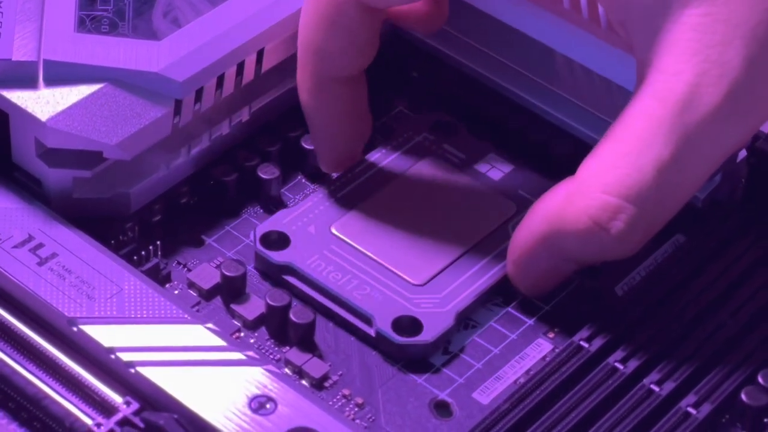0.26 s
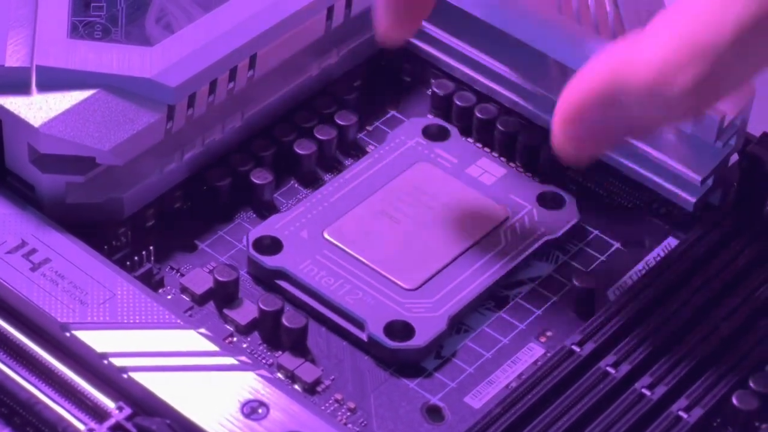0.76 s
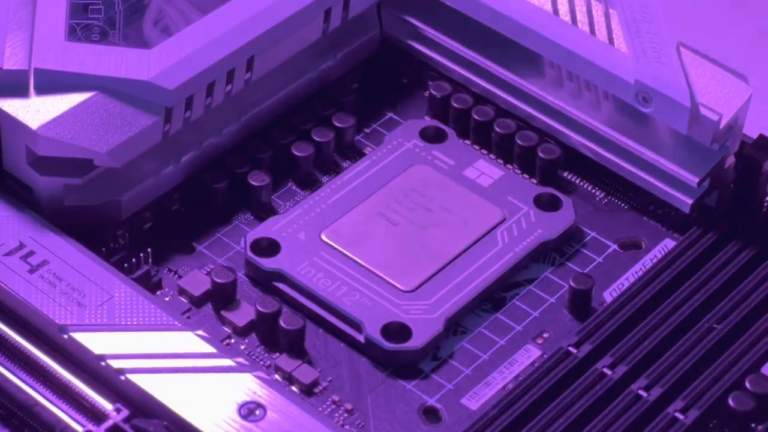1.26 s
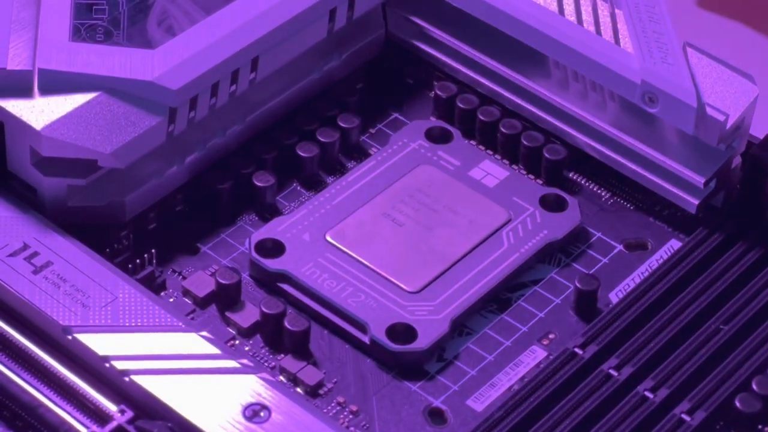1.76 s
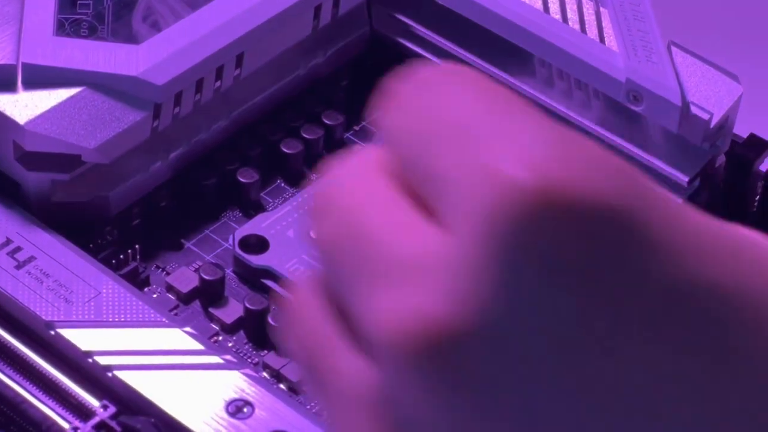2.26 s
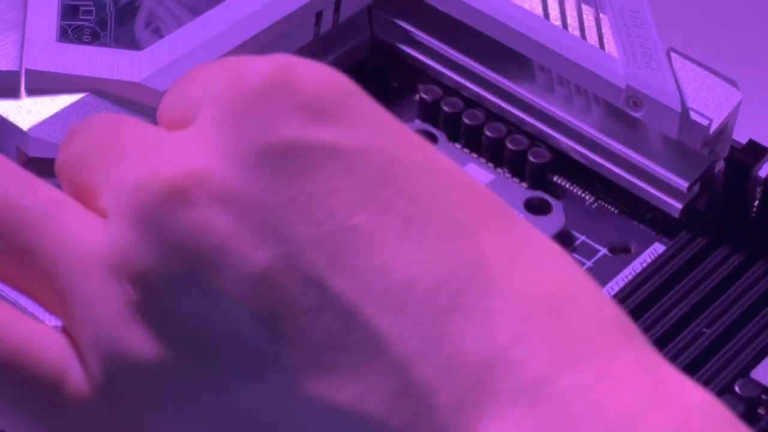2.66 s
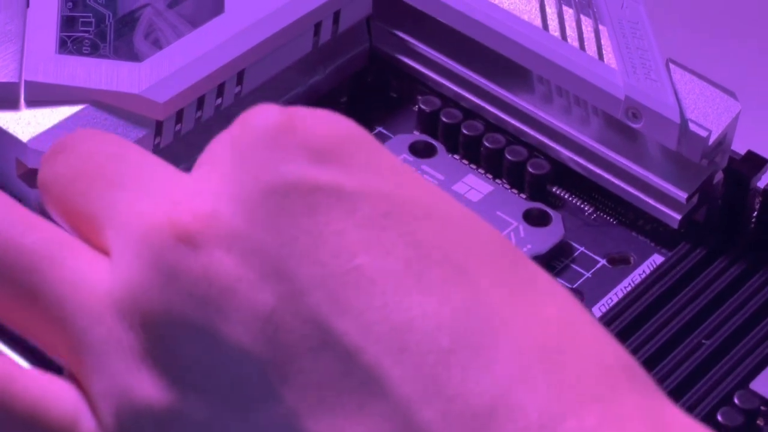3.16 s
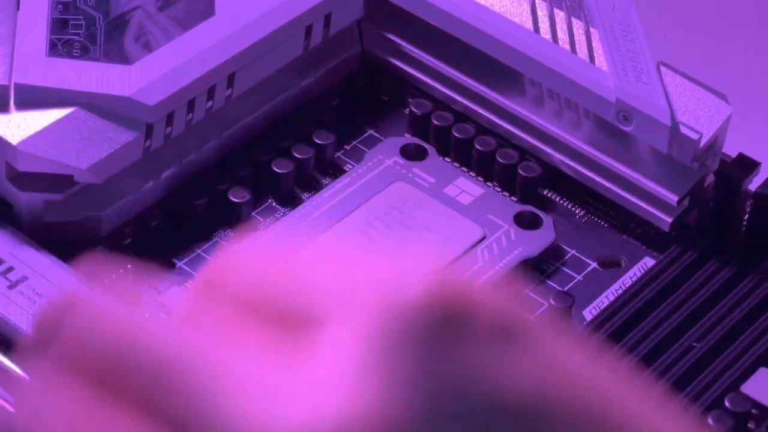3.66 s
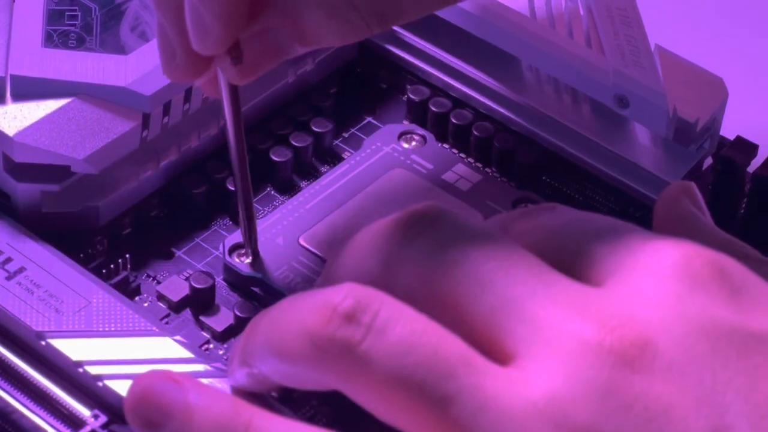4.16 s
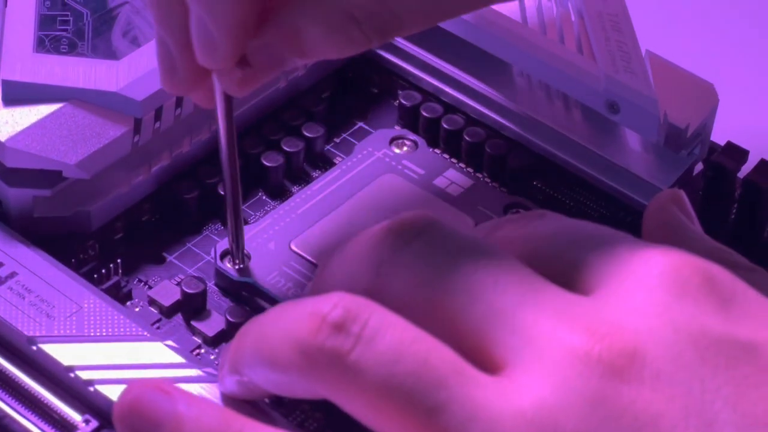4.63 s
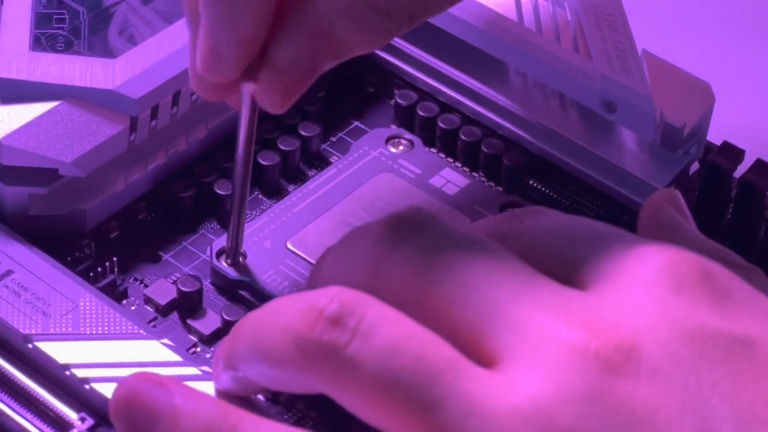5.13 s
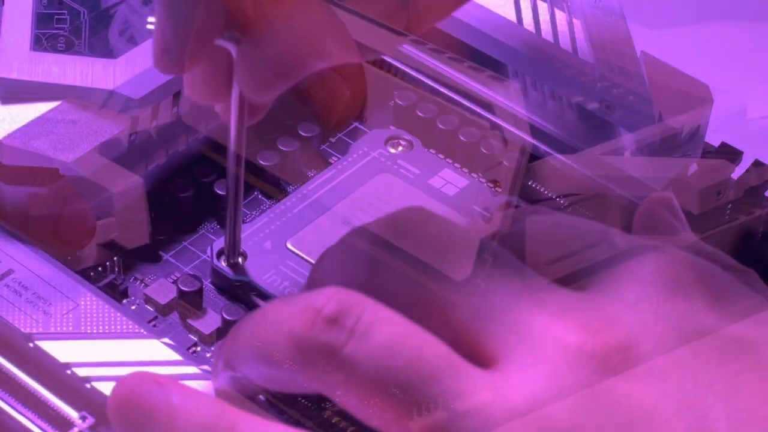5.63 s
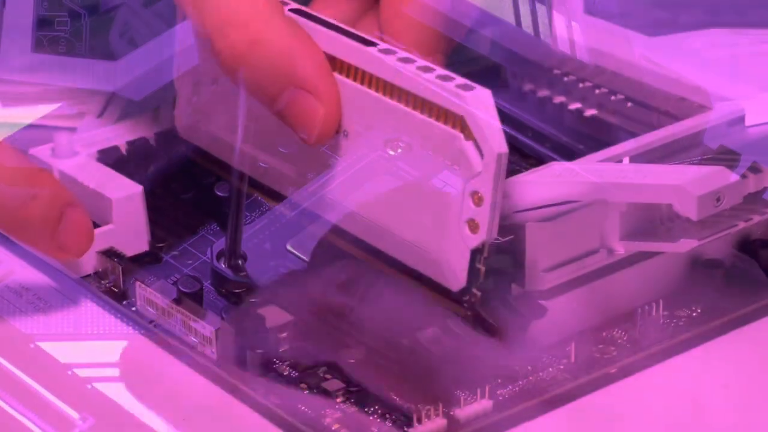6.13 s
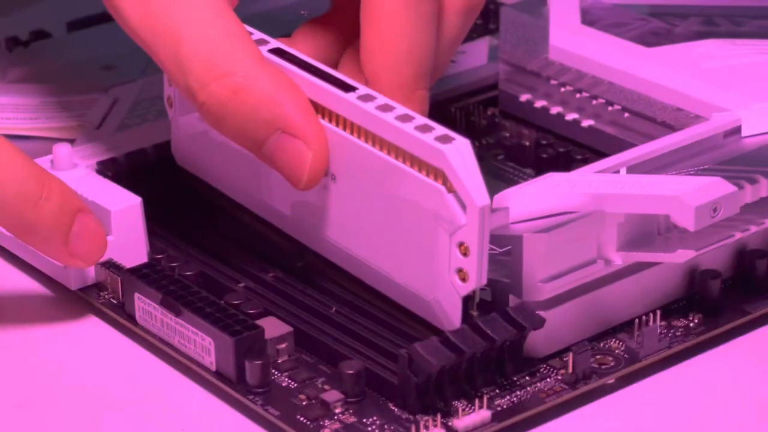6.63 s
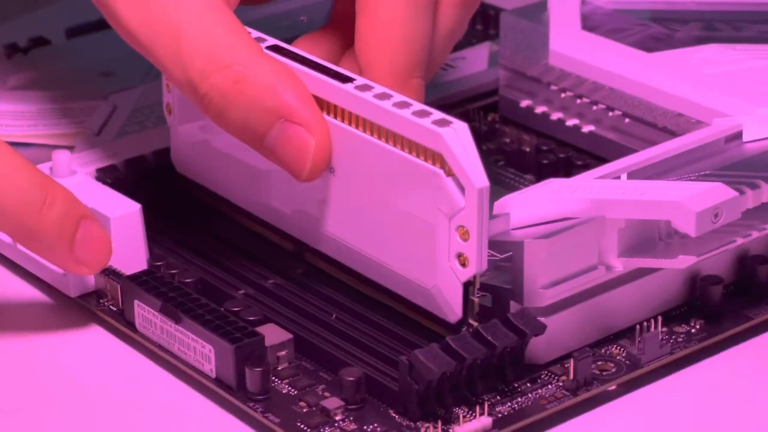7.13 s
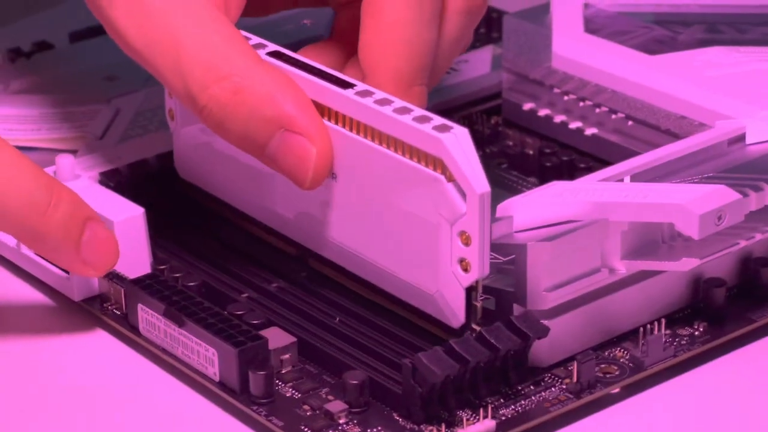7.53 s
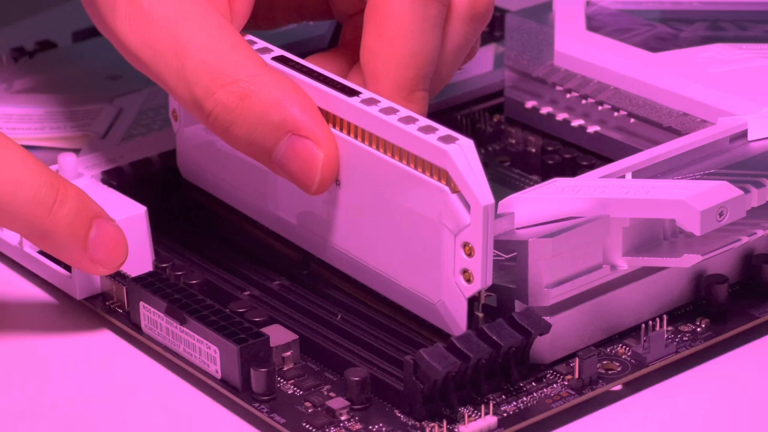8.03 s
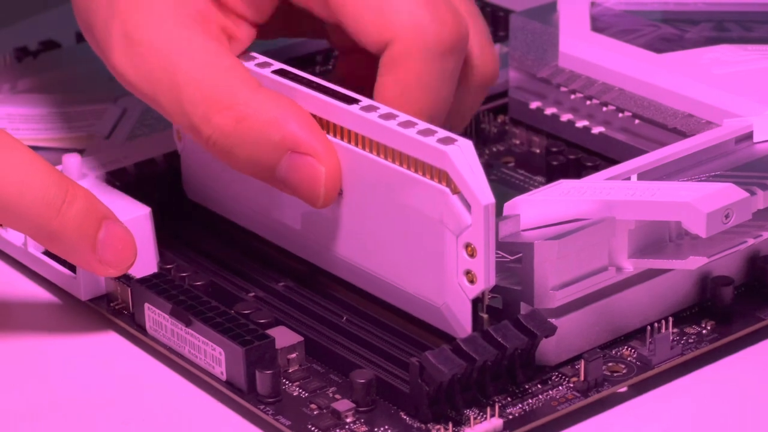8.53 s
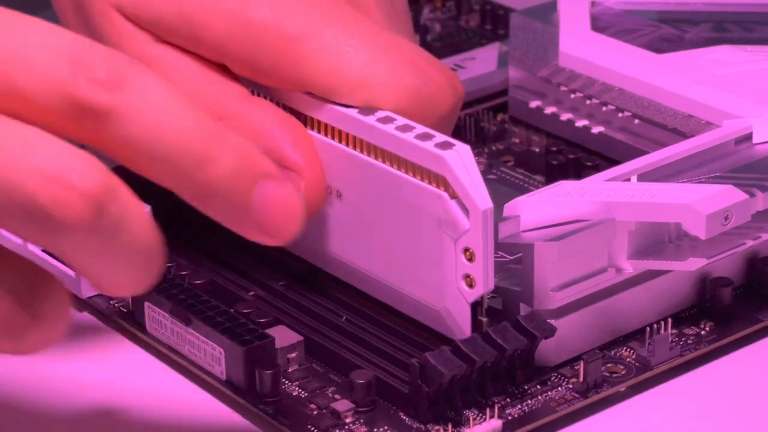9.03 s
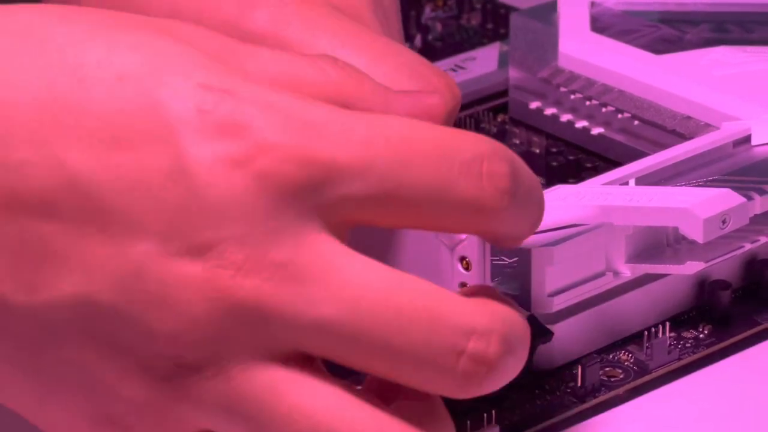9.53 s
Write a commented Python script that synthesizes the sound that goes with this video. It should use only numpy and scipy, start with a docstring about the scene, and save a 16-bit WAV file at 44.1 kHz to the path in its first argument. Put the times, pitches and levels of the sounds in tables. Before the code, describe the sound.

A small metal frame lands on a circuit board right at the start with a sharp, short clank and a soft desk thump. Near 1.8 seconds a part scuffs briefly over the desk. At about 2.9 seconds a screw drops, rattles brightly on the frame and bounces to rest. From 4.2 to 5.7 seconds a screwdriver makes light, irregular steel ticks in the screw head. From 6.5 seconds a memory module is worked into its slot with plastic clicks and dull knocks, while pushing hands make the desk rumble. A loud latch snap comes at 8.2 seconds, followed by smaller snaps until 8.8, faint finger rubbing and a hollow knock around 9.5. The work is close to a stereo microphone in a quiet room with a short, dull echo. Soft room air and mains hum lie underneath, joined from about 4 seconds by a faint, wavering low drone.

```python
"""A metal frame clanks down on a desk, close to a stereo microphone in a quiet room: a computer is being
built by hand. A part scuffs over the desk, a screw drops and rattles on the frame, a screwdriver ticks
in a screw head, then a memory module is seated and its latches snap. Each contact is a crack of noise;
most also ring the modes of the part, and some leave a short noisy wash. Fingers rub, and pushing hands
make the desk rumble. Behind lie room air, mains hum, a few faint tones and a low wavering drone."""
import sys
import numpy as np
from scipy import signal
from scipy.fft import rfft, irfft, next_fast_len
from scipy.io import wavfile

SR = 44100
rng = np.random.default_rng(int(sys.argv[2]) if len(sys.argv) > 2 else 0)


def dump(signal):
    """Clip the signal to [-1, 1] and save it as 16-bit WAV at the path in sys.argv[1]."""
    limited = np.clip(np.atleast_2d(signal).T, -1, 1)
    pcm = np.round(limited * 32767).astype(np.int16)
    wavfile.write(sys.argv[1], SR, pcm)


N = 431738

# Levels are relative: each source adds its own gains and filters.
# spectrum of the room air (frequency [Hz], level [dB])
AIR_SPECTRUM = [(18, -39.5), (35, -0.5), (59, 2), (92, -5.5), (170, -5.5), (366, -13), (700, -22),
                (1760, -37), (2900, -43), (4300, -57.5), (7500, -55), (10000, -59), (13500, -51.5),
                (15200, -59)]
# likeness of the air at left and right (frequency [Hz], correlation [0-1])
AIR_CORRELATION = [(30, 0.41), (120, 1), (250, 0.91), (500, 0.59), (1500, 0.9), (4000, 1), (12000, 0.9)]
# borders of the five air bands (frequency [Hz])
AIR_CROSSOVERS = [75, 300, 1200, 4000]
# lowest air band (time [s], level [dB])
AIR_DEEP_BASS = [(0, -67), (1.0, -66), (1.6, -57), (2.05, -64), (2.5, -57.5), (2.9, -61.5), (3.8, -68),
                 (5.0, -62.5), (5.9, -63.5), (6.25, -69.5), (7.3, -55.5), (8.0, -56.5), (8.3, -50),
                 (8.6, -57.5), (9.05, -53.5), (9.4, -60), (9.79, -61)]
# four upper air bands (level [dB], swell followed [dB per dB])
AIR_UPPER_BANDS = [(-62.5, 0.54), (-66.5, .9), (-77, 1.1), (-87.5, .3)]
# distant wash, strongest in the middle bands (time [s], level [dB])
AIR_SWELL = [(0, 3.5), (1.0, 0.5), (3.85, -0.5), (3.92, 4.5), (4.6, 5), (5.55, 8.5), (5.95, 2.5),
             (7.5, 3.5), (9.79, 1)]
# mains hum (time [s], level [dB])
HUM_LEVEL = [(0, -58.5), (3.8, -63), (4.0, -64), (5.6, -66.5), (6.2, -76), (9.79, -71)]
# faint background tones (start [s], end [s], frequency [Hz], level [dB])
FAINT_TONES = [(.55, 0.75, 687, -65.5), (4.0, 5.3, 344.6, -66.5), (4.3, 5.8, 499, -70),
               (5.301, 5.7, 1104, -72.5), (6.4, 9.79, 302, -63), (0, 3.7, 361, -74), (0, 4.8, 244, -71)]
# modes of the metal frame (frequency [Hz])
FRAME_PITCHES = [752, 845, 946, 1100, 1192, 1500, 1643, 1810, 1900, 1970, 2872, 2905, 5097, 5917, 6519,
                 7450, 8500, 10350, 11190, 12070, 12800, 12873, 14050, 15490]
# the same modes (level when set down [dB], level under the screw [dB], free t60 [s])
FRAME_RESPONSE = [(-11, -44, 0.09), (-14.5, -34, 0.08), (-15, -34.5, 0.08), (-12.5, -17, 0.056),
                  (-7.5, -16, 0.049), (-14.5, -14.5, .06), (-14.5, -28, 0.076), (-15.5, -6.5, 0.058),
                  (-11, -14, 0.1), (-20, -13, .06), (-2, -10, 0.05), (-19.5, -24, .12), (-11.5, -28, .06),
                  (-13, 1, .11), (-20.5, -10.5, 0.051), (-12, -12.5, 0.077), (-18, -14, 0.04),
                  (-20.5, -10, 0.084), (-30, -15, 0.18), (-25.5, -10, .08), (-24.5, -6.5, 0.14),
                  (-19.5, -9, 0.11), (-33, -40, .06), (-45.5, -20, .1)]
# frame landing (time [s], level [dB], desk thump [dB])
FRAME_HITS = [(0.0927, -28.5, -36), (0.1036, -11.5, -31), (0.1064, -13, -36)]
# modes of the thumped desk (frequency [Hz], level [dB], t60 [s])
DESK_MODES = [(61.02, -12, 0.23), (107.5, -1.5, 0.21), (155.25, -1, 0.2), (207.4, -6, .4), (299, -19, .3),
              (393.5, -14.5, 0.13)]
# hands pushing down (peak time [s], level [dB], t60 [s])
HAND_PUSHES = [(6.2, -60, 1.8), (6.54, -43, 0.62), (6.849, -43, 0.12), (7.27, -48, 0.31), (7.62, -51, 0.55),
               (8.17, -37, 0.93), (8.34, -46.5, 0.39), (8.71, -55, .3), (8.821, -45, 0.61),
               (9.54, -39.5, 0.27)]
# rubbing, and the short noisy wash after the frame, screw and latch hits
# (peak time [s], rise [s], hold [s], level [dB], treble [dB])
RUBS_AND_WASHES = [(.12, .01, 0.048, -60.5, -12.5), (1.148, 0.12, 0.019, -80.5, -2),
                   (1.399, .25, 0.22, -94, 5.5), (1.785, .05, 0.089, -58, -12.5),
                   (2.17, 0.028, .02, -82, 0), (2.3, 0.14, .55, -77.5, -16), (3.135, .005, 0.023, -66, 4),
                   (5.201, .6, .5, -72, -22), (6.499, 0.024, 0.021, -67, 1), (6.845, .01, 0.048, -68, -23),
                   (6.99, 0.0058, 0.063, -64.5, -16), (7.549, 0.066, 0.068, -64, -20),
                   (8.123, 0.027, 0.019, -52.5, -2.5), (8.197, .005, 0.16, -65, -15),
                   (8.435, .005, .08, -63.5, -16), (8.814, .005, 0.029, -65, -11.5),
                   (8.899, .05, 0.21, -92, 4), (9.114, .12, 0.09, -76, -4),
                   (9.516, 0.024, 0.02, -61.5, -31), (9.562, 0.0087, 0.012, -85.5, 12)]
# broad modes of rubbed plastic (frequency [Hz], level [dB], t60 [s])
PLASTIC_MODES = [(980, -6.5, 0.017), (1770, 2, 0.013), (2849, 1.5, 0.0031), (3650, -6, 0.011)]
# a dragged part catching on the desk (time [s], level [dB], treble [dB])
DRAG_CATCHES = [(1.741, -55, -13), (1.7793, -47, -4), (1.7844, -50, -8), (1.793, -49, 0.5),
                (1.8068, -49.5, 5.5), (1.861, -46, -0.5), (1.8854, -53, 1.5)]
# screw striking the frame (time [s], level [dB])
SCREW_HITS = [(2.9047, -41), (2.939, -54), (2.948, -53.5), (3.036, -41), (3.0421, -36.5), (3.052, -32),
              (3.066, -38.5), (3.078, -42), (3.09, -47.5), (3.105, -48), (3.117, -44)]
# screw bouncing to rest on the board (time [s], level [dB])
SCREW_BOUNCES = [(3.1347, -26), (3.1423, -27.5), (3.1547, -35)]
# modes of the board (frequency [Hz], level [dB], t60 [s])
BOARD_MODES = [(1290, -35, 0.0295), (2010, -18, 0.026), (2460, -29, 0.011), (2980, 3.5, 0.012),
               (3517, 8.5, 0.0092), (5100, -0.5, 0.011), (5630, -2, 0.011), (7100, -7, 0.014),
               (8750, -1, 0.014), (12900, -16, .012)]
# pitch of the low drone (time [s], frequency [Hz])
DRONE_PITCH = [(3.9, 198.1), (5.8, 199.9), (6.4, 205.8), (8.5, 207.7), (8.62, 203.6), (8.78, 209.4),
               (9.79, 206.7)]
# strength of the low drone (time [s], level [dB])
DRONE_LEVEL = [(3.9, -57), (4.3, -63.5), (4.9, -63), (5.45, -56.5), (5.95, -70.5), (6.5, -60), (7.05, -66),
               (7.4, -51.5), (7.52, -62), (7.66, -53), (7.85, -59.5), (8.03, -53.5), (8.55, -63),
               (8.66, -44.5), (8.77, -43), (8.89, -64.5), (9.45, -55), (9.56, -53), (9.79, -56.5)]
# bit ticking in the screw head (time [s], level [dB], treble [dB])
BIT_TICKS = [(4.2081, -49, -22), (4.214, -38.5, -2.5), (4.4067, -44, -9.5), (4.4785, -46, -34),
             (4.7987, -44, -10.5), (4.8207, -33.5, -8), (4.9441, -53, -35), (5.0344, -49.5, -36),
             (5.11, -41.5, -17.5), (5.272, -55.5, -14), (5.7063, -50.5, -20), (6.108, -63, -27),
             (6.134, -60, -27)]
# modes of screw and bit (frequency [Hz], level [dB], t60 [s])
BIT_MODES = [(1250, -20, 0.032), (1540, -13.5, 0.031), (1760, -9.5, 0.023), (1820, 2, 0.03),
             (2150, 2.5, 0.021), (2504, 2.5, 0.01), (2810, 0.5, 0.013), (3250, -9, 0.035),
             (5115, -1, 0.019), (5740, -2, 0.018), (7020, -7, .014), (8340, -23, 0.031), (12500, -20, .012)]
# module and latches clicking (time [s], level [dB], treble [dB], desk thump [dB])
MODULE_CLICKS = [(6.4996, -49.5, -19, -49.5), (6.5209, -34.5, -11, -37.5), (6.6059, -50, -31, -42.5),
                 (6.7336, -62, -27, -53.5), (6.8369, -42, -34, -50), (6.993, -36, -47, -54),
                 (7.5563, -35, -42, -44.5), (7.6385, -43.5, -33, -43), (7.711, -55.5, -22, -51),
                 (8.125, -44, -8, -60), (8.143, -41, -5, -63), (8.163, -47, -10, -62),
                 (8.197, -24, -3, -36), (8.3124, -29.5, -9, -54), (8.4368, -36, -8.5, -52),
                 (8.493, -44, -37, -48.5), (8.5302, -56.5, 3, -60), (8.8065, -32.5, -17, -38),
                 (9.1193, -49.5, 1.5, -54), (9.4808, -52, -26, -43), (9.518, -43.5, -16, -50),
                 (9.579, -70.5, -12, -56)]
# modes of module and latches (frequency [Hz], level [dB], t60 [s])
MODULE_MODES = [(674, -0.5, 0.031), (960, -9, .03), (1330, -1.5, 0.026), (1650, -8.5, 0.044),
                (1834, -0.5, 0.032), (2134, -5.5, 0.022), (2443, 6.5, 0.013), (2816, 6, 0.019),
                (2960, -10, 0.015), (3420, -14, 0.015), (3754, -18, .012), (4430, 0.5, 0.0087),
                (5130, -7, .012), (6130, -3, 0.035), (7460, -10.5, .012), (12500, -20, .012)]
# knocks on the slot (time [s], level [dB])
SLOT_KNOCKS = [(8.123, -36.5), (8.135, -50), (8.152, -40), (8.161, -40), (9.489, -34.5), (9.501, -49)]
# hollow modes of the slot (frequency [Hz], level [dB], t60 [s])
SLOT_MODES = [(548, 5.5, 0.062), (753, -5, 0.044), (765, -27, 0.018), (1020, -4.5, 0.045),
              (1180, -18, 0.039)]
# balance at the microphone (frequency [Hz], left minus right [dB])
MIC_BALANCE = [(60, 0), (150, 1), (380, -0.5), (700, 2), (1290, 2), (2400, 0)]
# phase at the microphone (frequency [Hz], lead of left over right [rad])
MIC_PHASE = [(0, 0), (60, .25), (300, .3), (820, .8), (1210, -.5), (1900, -.1), (2900, .55), (5000, .5),
             (5900, -.55), (7300, -.3), (8400, -1.1), (9500, -3.0), (10700, -3.4), (12600, -5.6),
             (14500, -6.8), (15300, -8.3), (16000, -8.5)]
# brief dips of the whole sound (time [s], half width [s])
LEVEL_DIPS = [(2.136, 0.029), (3.868, 0.029)]

TREBLE_HZ, TOP_HZ = 4000, 8300   # borders between body, edge and top of a contact sound


def from_db(db):
    """Gain of a level in dB."""
    return 10 ** (np.asarray(db) / 20)


def unit_rms(x):
    """Scale to unit rms."""
    return x / np.sqrt(np.mean(x ** 2) + 1e-20)


def in_time(curve):
    """Read a (time, value) curve at every sample."""
    return np.interp(np.arange(N) / SR, *np.transpose(curve))


def at_hz(curve, hz):
    """Read a (frequency, value) curve on a log-frequency axis."""
    points_hz, values = np.transpose(curve)
    return np.interp(np.log(hz + 1), np.log(points_hz), values)


def band(x, low_hz, high_hz):
    """Steep band-pass."""
    return signal.sosfilt(signal.butter(3, [low_hz, high_hz], "band", fs=SR, output="sos"), x)


def pass_filter(x, kind, hz):
    """Steep high-pass or low-pass."""
    return signal.sosfilt(signal.butter(4, hz, kind, fs=SR, output="sos"), x)


def ring(force, hz, t60):
    """One mode: a unit click starts a dying sine of height 1."""
    r, w = from_db(-60 / (t60 * SR)), 2 * np.pi * hz / SR
    return signal.lfilter([0, np.sin(w)], [1, -2 * r * np.cos(w), r * r], force + 1e-18)


def decay(clicks, t60):
    """Give each click an exponential tail."""
    return signal.lfilter([1], [1, -from_db(-60 / (t60 * SR))], clicks + 1e-18)


def train(times, db):
    """Clicks at given times and levels."""
    out = np.zeros(N)
    np.add.at(out, np.round(times * SR).astype(int), from_db(db))
    return out


def drift(rate_hz):
    """Slow random wander of unit rms."""
    hop, settle = 64, 2000
    r = np.exp(-2 * np.pi * hop * rate_hz / SR)
    noise = rng.standard_normal(N // hop + settle + 2)
    slow = signal.lfilter([1], [1, -2 * r, r * r], noise)[settle:]
    return np.interp(np.arange(N) / hop, np.arange(len(slow)), unit_rms(slow))


def stroke(peak_s, rise_s, hold_s, t60):
    """Envelope: curved rise, hold, exponential release."""
    t = np.arange(N) / SR - peak_s
    return np.clip(1 + t / rise_s, 0, 1) ** 2 * from_db(-60 * np.clip(t - hold_s, 0, 2) / t60)


def crack(times, db, treble_db, t60, top_db):
    """Bursts of contact noise in three bands: body, edge and top."""
    noise = rng.standard_normal(N)
    body = noise * decay(train(times, db), t60)
    edge = noise * decay(train(times, db + treble_db), t60)
    top = from_db(top_db) * band(edge, TOP_HZ, 19000)
    return band(body, 800, TREBLE_HZ) + band(edge, TREBLE_HZ, TOP_HZ) + top


def blows(times, db, treble_db, modes, ring_db, contact_t60, crack_db, crack_t60, top_db):
    """Each blow is a crack, plus a tap and a scrape that shake every mode with its own strength."""
    scatter_db = rng.normal(0, 2, (len(times), len(modes)))
    noise = rng.standard_normal((2, N))
    low, high = np.zeros((2, N))
    for k, (hz, mode_db, t60) in enumerate(modes):
        is_treble = hz > TREBLE_HZ
        tap = train(times, db + ring_db + mode_db + treble_db * is_treble + scatter_db[:, k])
        scrape = noise[k % 2] * decay(tap, contact_t60) / np.sqrt(contact_t60 * SR / 14)   # tap's energy
        ringing = ring(.9 * tap + .6 * scrape, hz, t60)
        if is_treble:
            high += ringing
        else:
            low += ringing
    soft = band(low, 330, 3100)   # a contact of finite length starts the low modes without a click
    return soft + high + crack(times, db + crack_db, treble_db, crack_t60, top_db)


def room_air():
    """Stereo noise all around: the deep bass wanders, four bands share a swell, and all five flicker."""
    size = next_fast_len(N)
    hz = np.arange(size // 2 + 1) * SR / size
    mid, side = rfft(rng.standard_normal((2, size))) * from_db(at_hz(AIR_SPECTRUM, hz))
    alike = at_hz(AIR_CORRELATION, hz)
    pair = np.sqrt(1 + alike) * mid + np.sqrt(1 - alike) * side * [[1], [-1]]
    below = [1 / (1 + (hz / edge) ** 4) for edge in AIR_CROSSOVERS]
    power_shares = np.diff(below, axis=0, prepend=0, append=1)
    bands = [unit_rms(irfft(pair * np.sqrt(share), size)[:, :N]) for share in power_shares]
    levels = [in_time(AIR_DEEP_BASS)]
    levels += [db + follow * in_time(AIR_SWELL) for db, follow in AIR_UPPER_BANDS]
    flicker_db = 1.4
    return sum(from_db(db + flicker_db * drift(rate_hz=2.8)) * part for db, part in zip(levels, bands))


def hum_and_whine():
    """A sine of mains hum and a very faint whine of narrow noise, in the background."""
    hum_hz = 120
    hum = np.sqrt(2) * np.sin(2 * np.pi * hum_hz * np.arange(N) / SR)
    whine = unit_rms(ring(rng.standard_normal(N), hz=1150, t60=0.86))
    return from_db(in_time(HUM_LEVEL)) * hum + from_db(-88.5) * whine


def faint_tones():
    """Noise in narrow resonances, fading in and out behind the work."""
    t, noise = np.arange(N) / SR, rng.standard_normal(N)
    out = np.zeros(N)
    for start, end, hz, db in FAINT_TONES:
        fade = np.clip(np.minimum(t - start, end - t) / .1, 0, 1)
        out += from_db(db) * fade * unit_rms(ring(noise, hz, t60=0.67))
    return out


def frame_set_down():
    """The metal frame lands on the board, close by; the fingers holding it halve its ring time."""
    mode_db, _, free_t60 = np.transpose(FRAME_RESPONSE)
    held_modes = list(zip(FRAME_PITCHES, mode_db, 0.5 * free_t60))
    times, db, _ = np.transpose(FRAME_HITS)
    return blows(times, db, 0, held_modes,
                 ring_db=-5.5, contact_t60=0.019, crack_db=-8.5, crack_t60=0.019, top_db=-4.5)


def desk():
    """Frame and module thump the desk modes; resting or pushing hands shake them with noise."""
    times, thump_db = np.transpose([(hit[0], hit[-1]) for hit in FRAME_HITS + MODULE_CLICKS])
    scatter_db = rng.normal(0, 3, (len(times), len(DESK_MODES)))
    shake = rng.standard_normal(N)
    lag_s, rise_s = .004, 0.041
    thumps, rumble = np.zeros((2, N))
    for k, (hz, db, t60) in enumerate(DESK_MODES):
        thumps += ring(train(times + lag_s, thump_db + db + scatter_db[:, k]), hz, t60)
        rumble += from_db(db) * unit_rms(ring(shake, hz, 0.36 * t60))
    resting = from_db(-56) * stroke(peak_s=6.18, rise_s=rise_s, hold_s=N / SR, t60=1)
    pushing = sum(from_db(db) * stroke(at, rise_s, 0, t60) for at, db, t60 in HAND_PUSHES)
    return thumps + (resting + pushing) * unit_rms(rumble)


def rubs_and_washes():
    """Dense uneven grains of noise: rubbing, and the short wash after the frame, screw and latch hits."""
    noise = rng.standard_normal(N)
    grain_db = 2.4 * rng.exponential(1, N // 64 + 1).clip(0, 3)
    grains = noise * from_db(grain_db).repeat(64)[:N]
    plastic = sum(from_db(db) * unit_rms(ring(grains, hz, t60)) for hz, db, t60 in PLASTIC_MODES)
    low = unit_rms(band(grains + .8 * unit_rms(plastic), 550, TREBLE_HZ))
    high = unit_rms(band(grains, TREBLE_HZ, TOP_HZ) + from_db(2) * band(grains, TOP_HZ, 12000))
    return sum(from_db(db) * stroke(at, rise, hold, t60=0.22) * (low + from_db(treble_db) * high)
               for at, rise, hold, db, treble_db in RUBS_AND_WASHES)


def room_tail(x):
    """The walls return a short dull tail, longer in the low middle, a little different on each side."""
    t = np.arange(round(SR / 2)) / SR
    bright_t60, low_t60, wall_cut_hz = 0.25, 0.33, 8000
    noise = rng.standard_normal((2, 3, len(t))) * np.clip(t / .008, 0, 1)
    bright = noise[0] * from_db(-60 * t / bright_t60)
    low = from_db(-6.5) * band(noise[1], 410, 1400) * from_db(-60 * t / low_t60)
    tails = bright + low   # rows: common, left, right
    pair = (tails[0] + 0.36 * tails[1:]) / np.sqrt(np.sum(bright[0] ** 2))
    dulled = signal.lfilter(*signal.butter(1, wall_cut_hz, fs=SR), pair)
    return signal.fftconvolve(x[None], dulled, axes=1)[:, :N]


def dragged_part():
    """A part drags over the desk in small dry catches: all crack, no ring."""
    times, db, treble_db = np.transpose(DRAG_CATCHES)
    return blows(times, db, treble_db, modes=[],
                 ring_db=0, contact_t60=1, crack_db=-2.5, crack_t60=0.088, top_db=-29)


def dropped_screw():
    """A screw rattles on the freely ringing frame, then bounces to rest on the board."""
    _, mode_db, t60 = np.transpose(FRAME_RESPONSE)
    times, db = np.transpose(SCREW_HITS)
    rattle = blows(times, db, 0, list(zip(FRAME_PITCHES, mode_db, t60)),
                   ring_db=-1.5, contact_t60=0.067, crack_db=-17.5, crack_t60=0.049, top_db=15)
    times, db = np.transpose(SCREW_BOUNCES)
    bounces = blows(times, db, 0, BOARD_MODES,
                    ring_db=-10, contact_t60=0.015, crack_db=-11.5, crack_t60=0.028, top_db=0)
    return pass_filter(rattle + bounces, "high", hz=930)   # small steel parts give no bass


def drone():
    """A low sine comes and goes in the background, wavering in pitch and level."""
    waver_hz, waver_db, fade_s = 1.51, 1.0, 0.076
    hz = in_time(DRONE_PITCH) + waver_hz * drift(rate_hz=5.025)
    db = in_time(DRONE_LEVEL) + waver_db * drift(rate_hz=6.9)
    fade_in = np.clip((np.arange(N) / SR - DRONE_LEVEL[0][0]) / fade_s, 0, 1)
    return fade_in * np.sqrt(2) * from_db(db) * np.sin(2 * np.pi * np.cumsum(hz) / SR)


def screwdriver():
    """The bit knocks in the screw head: short steel ticks without bass."""
    times, db, treble_db = np.transpose(BIT_TICKS)
    ticks = blows(times, db, treble_db, BIT_MODES,
                  ring_db=-5.5, contact_t60=0.017, crack_db=-3.5, crack_t60=0.035, top_db=-0.5)
    return pass_filter(ticks, "high", hz=930)


def memory_module():
    """The module is pressed home: plastic latches snap and the slot knocks hollow."""
    times, db, treble_db, _ = np.transpose(MODULE_CLICKS)
    snaps = blows(times, db, treble_db, MODULE_MODES,
                  ring_db=-11.5, contact_t60=0.063, crack_db=-7, crack_t60=0.062, top_db=-9.5)
    times, db = np.transpose(SLOT_KNOCKS)
    knocks = blows(times, db, treble_db=-19, modes=SLOT_MODES,
                   ring_db=-5.5, contact_t60=0.022, crack_db=-24, crack_t60=0.029, top_db=-4)
    return snaps + knocks


def scene():
    """The work close up and centred, its quieter room tail, then the desk and the background."""
    work = frame_set_down() + dropped_screw() + screwdriver() + memory_module()
    work += dragged_part() + rubs_and_washes()
    foreground = work + from_db(-10) * room_tail(work) + desk()
    return foreground + drone() + faint_tones() + room_air() + hum_and_whine()


def record(dry):
    """Stereo microphone: the sides differ in phase and level, bass and top are cut. Separately, the whole sound
    dips briefly twice."""
    size = next_fast_len(N + 4096)
    hz = np.arange(size // 2 + 1) * SR / size
    lead = np.interp(hz, *np.transpose(MIC_PHASE))
    left = from_db(at_hz(MIC_BALANCE, hz) / 2) * np.exp(.5j * lead)   # the right side gets the inverse
    out = irfft(rfft(dry, size) * [left, 1 / left], size)[:, :N]
    out = pass_filter(out, "high", hz=33)
    out = pass_filter(out, "low", hz=14900)
    t = np.arange(N) / SR
    for at, half_width in LEVEL_DIPS:
        out *= np.clip(np.abs(t - at) / half_width, .03, 1)
    stopband_hz = 16400
    return signal.sosfilt(signal.cheby2(12, 70, stopband_hz, fs=SR, output="sos"), out)


dry = scene()
out = record(dry)
dump(out)
```